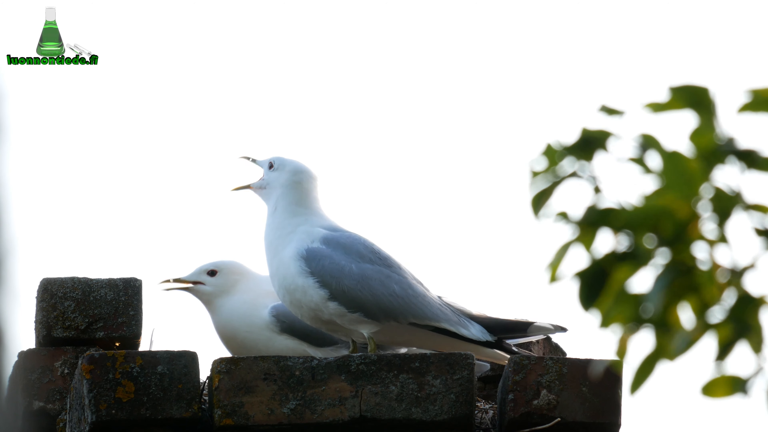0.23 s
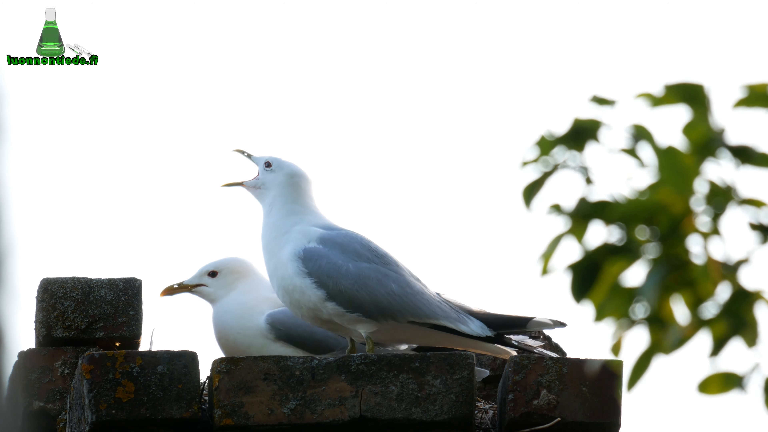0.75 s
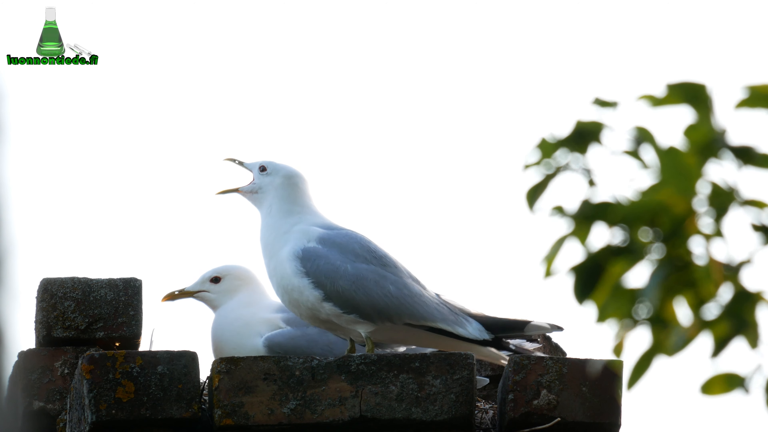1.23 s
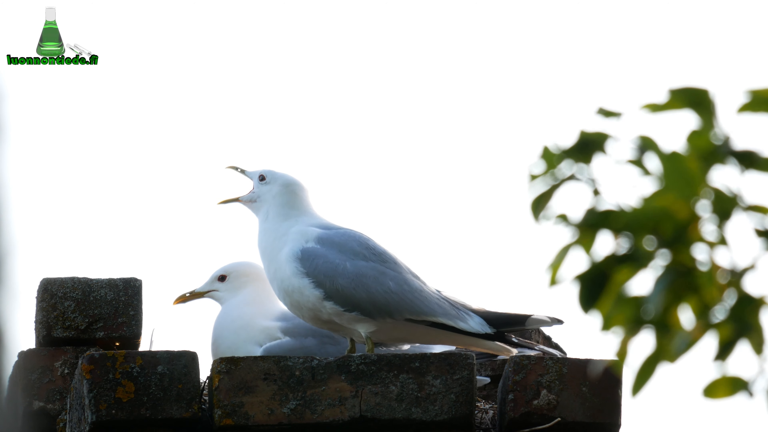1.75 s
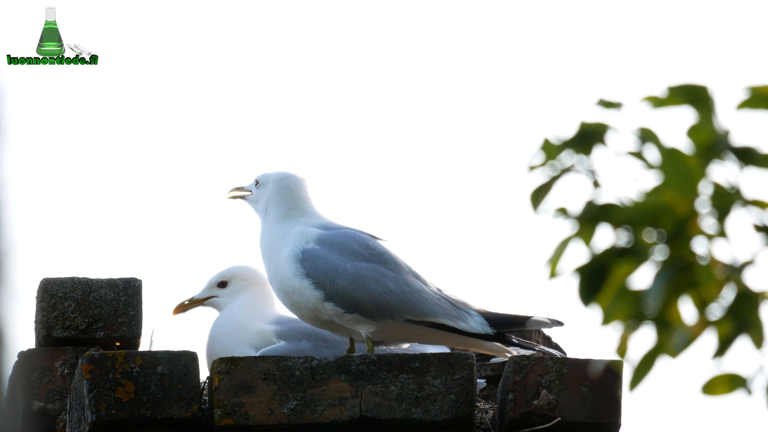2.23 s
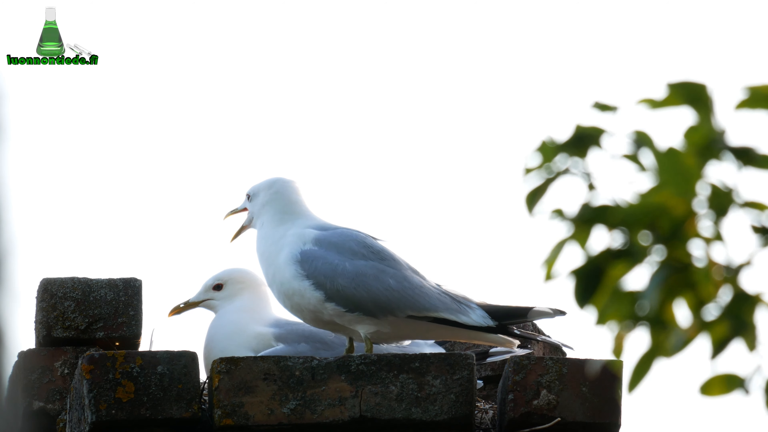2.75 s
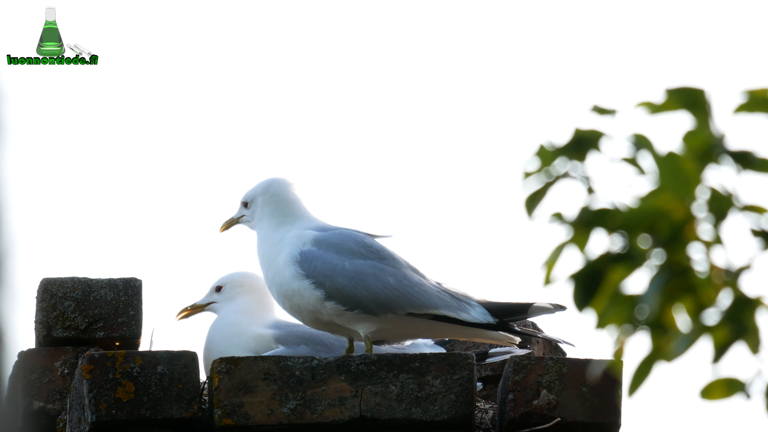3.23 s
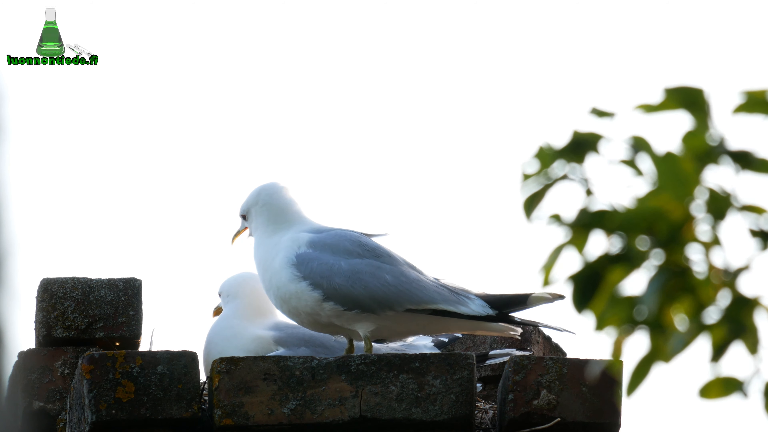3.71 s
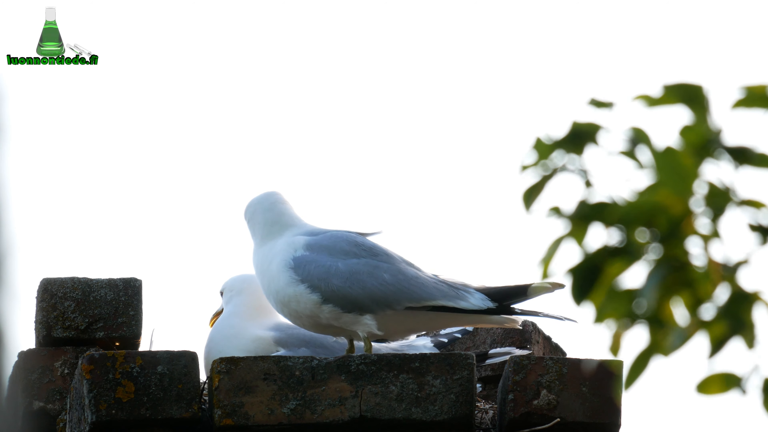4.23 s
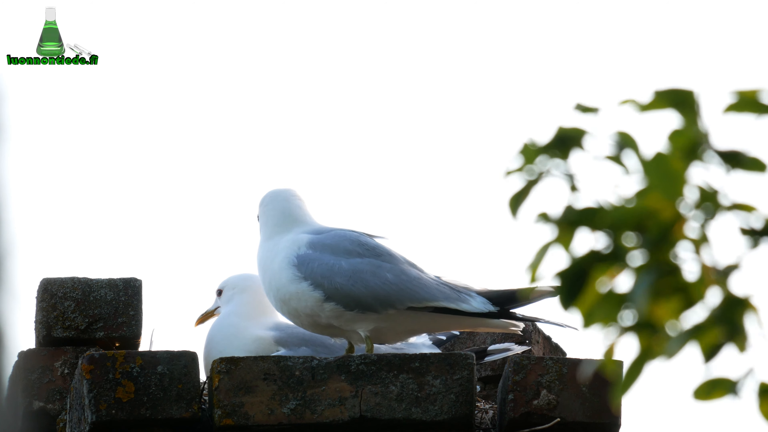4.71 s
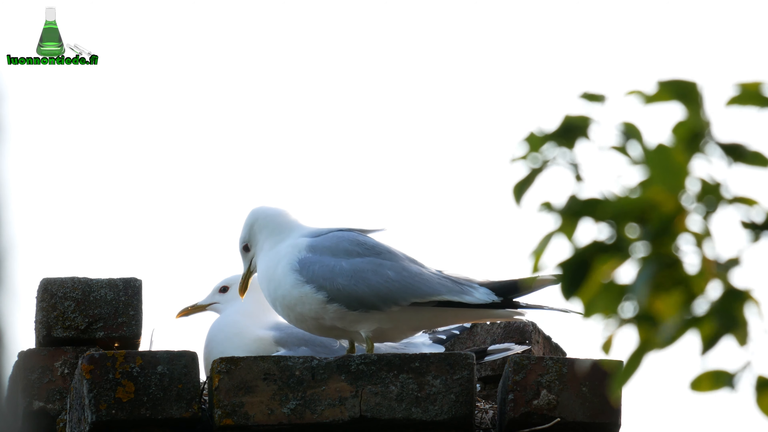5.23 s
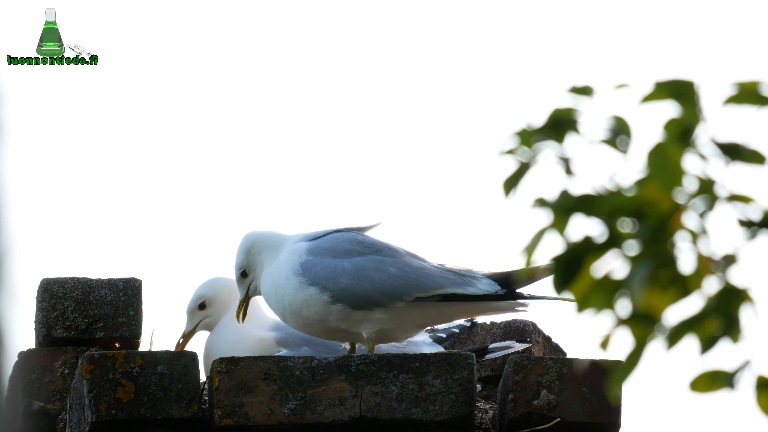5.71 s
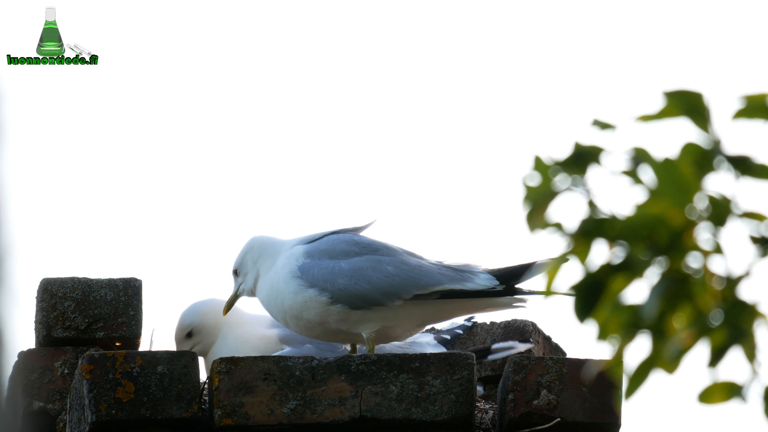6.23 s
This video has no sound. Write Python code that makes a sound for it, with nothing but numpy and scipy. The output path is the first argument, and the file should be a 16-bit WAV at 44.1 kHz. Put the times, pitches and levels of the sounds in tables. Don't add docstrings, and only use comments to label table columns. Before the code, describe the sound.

A gull calls from a chimney among houses, fairly close and almost central, with clear wall slaps and a diffuse echo tail. At 0 s the end of a long call rasps out, overlapped by a short, cut-off note from a second gull. From about 0.2 to 2.1 s, six rapid cries come roughly every third of a second; each scoops up from a low hoarse start, cracks into the bright nasal main note, flips briefly to a thin high whistle, and falls back drooping. From about 2.2 s the whistles vanish: strained single yelps settle into calmer, smoother, slightly duller cries as the head turns away, spacing out a little until 4.5 s. After a short gap, one last cry at 5.0 s droops lowest. Its echo fades into faint, wide, low traffic hum until about 6.4 s.

```python
import sys
import numpy as np
from scipy import signal
from scipy.fft import rfft, irfft
from scipy.io import wavfile
from scipy.ndimage import uniform_filter1d, map_coordinates

SR = 44100
rng = np.random.default_rng(int(sys.argv[2]) if len(sys.argv) > 2 else 0)


def attenuation_scalar(level_db):
    decades = np.asarray(level_db, float) / 20
    return 10 ** decades


def wrap_up_sound(samples):
    columns = np.atleast_2d(samples).T
    tamed = np.clip(columns, -1, 1)
    steps = np.round(tamed * 32767).astype(np.int16)
    wavfile.write(sys.argv[1], SR, steps)


N = 285327
LEAD_IN = SR // 4

# start in seconds, length in seconds, lowest pitch in Hz, highest pitch in Hz,
# level in dB.
LEAD_INS = [(0.189, .026, 634.2, 826.8, -42), (.545, 0.0329, 628.1, 879.6, -41.5),
            (0.897, 0.0276, 672.3, 860.4, -40), (1.237, 0.0314, 625.5, 865.6, -39.5),
            (1.577, 0.0362, 674.9, 899.7, -39), (1.905, 0.0421, 617.1, 883.4, -41.5),
            (2.231, 0.0406, 612.4, 911, -41), (2.543, 0.0548, 600, 893.1, -43.5),
            (2.894, 0.0303, 677.2, 906.4, -43.5), (3.232, .03, 609.6, 843, -48.5),
            (3.578, 0.0386, 640.3, 927, -44), (3.958, 0.0298, 716.3, 912.8, -45)]
HOOKED_LEAD_INS = [
    (4.355, .028, 791.5, 1006, -45.5),
    (5.008, 0.02806, 779.7, 963, -50.5),
]
VOICE_BREAKS = [(-.04, 0.0372, 1185, 1247, -32.5), (.214, 0.047, 1075, 1277, -40.5),
                (.578, 0.0488, 1149, 1319, -41), (.928, 0.0461, 1163, 1289, -39.5),
                (1.272, .046, 1208, 1322, -40), (1.614, 0.0457, 1215, 1316, -40),
                (1.947, 0.0498, 1211, 1332, -41)]
WHISTLE_FLIPS = [(.628, 0.05746, 2912, 3132, -41), (.973, 0.0632, 2923, 3156, -39.5),
                 (1.318, 0.061, 2961, 3187, -39), (1.662, .046, 2987, 3286, -39),
                 (2.005, 0.0324, 3039, 3256, -41.5)]
LONG_WHISTLE_FLIPS = [
    (0.262, .087, 2791, 3046, -36),
]
FALLING_NOTES = [(-.2, 0.1437, 916.7, 1311, -36), (.35, 0.0696, 983.2, 1302, -34.5),
                 (.695, 0.0782, 984.2, 1338, -35.5), (1.038, 0.0797, 982.1, 1341, -34.5),
                 (1.382, .073, 1007, 1370, -34), (1.707, .078, 1028, 1376, -34.5)]
SAGGING_NOTES = [
    (2.033, .082, 1035, 1398, -36.5),
]
RASPING_ENDS = [
    (.008, 0.07, 905.3, 1233, -37),
]
STRAINED_NOTES = [
    (2.272, .15, 1059, 1344, -37.5),
    (2.595, .137, 885.7, 1342, -37.5),
]
SETTLING_NOTES = [
    (2.925, .15, 1022, 1347, -36),
]
CALM_NOTES = [
    (3.261, 0.1472, 907.5, 1314, -36),
    (3.61, 0.1422, 911, 1363, -35.5),
    (3.99, 0.1361, 878, 1389, -35.5),
    (4.383, .152, 867.7, 1437, -35.5),
]
FINAL_NOTES = [
    (5.035, .147, 658, 1487, -38),
]
SECOND_GULL = [
    (-0.0078, .077, 1500, 1455, -39),
]

# share of length 0-1, height in the
# pitch range 0-1, level in dB, brightness in dB per octave, then (except slide and flips) fundamental in dB
# and third harmonic in dB.
SLIDE_SHAPE = [(0, 0.0067, -8, -4.5), (.4, .52, -2.5, 0.5), (.75, .86, -0.5, -1), (1, 0.985, 2.5, 1.5)]
HOOK_SHAPE = [(0, 0.092, -9, -8.5, 0.0034, -8), (.3, 0.077, -5, -2, 0.002, -8.5), (.7, .45, -1, 3.5, 0, -4),
              (1, 0.92, 2.5, 0, 0, 2)]
BREAK_SHAPE = [(0, 0.031, 11.5, -23, -7.5, -14), (.22, 0.48, 6.5, -5, 1, -4.5),
               (.4, 0.986, -1, 3, 9.5, -1.5), (.7, 0.978, -1, -1.5, 0.5, -3), (1, 0.95, 1, -2.5, 4, 0)]
FLIP_SHAPE = [(0, 0.87, -2.5, -6.5), (.15, 0.8, -2, 6.5), (.6, 1, -5.5, 10), (.8, 0.65, 2, 0), (1, 0, 8, 5)]
LONG_FLIP_SHAPE = [(0, 0.24, -2.5, 1), (.12, .25, 0, 6), (.55, 1, 0.5, -3.5), (.75, .9, -4.5, -0.5),
                   (1, 0, 5.5, 6)]
FALL_SHAPE = [(0, 0.971, -6, 7, 10.5, 3.5), (.22, 0.9672, -1, 2, 7.5, 0), (.58, .93, -2.5, 5, 5.5, 6.5),
              (.73, .37, 3, 6, -8, -9), (.88, 0.1642, 0, 3, -6.5, -3.5), (1, 0.087, -9.5, 0, -12.5, -9.5)]
SAG_SHAPE = [(0, 0.918, -4, 1.8, -2.5, 3.5), (.15, 0.843, -1.5, 3, 5, -2), (.58, .42, 5, 0, -4, -12),
             (.78, .22, -2, 3, -8, -7), (1, 0.0079, -12, 1, -4, -5.5)]
STRAINED_SHAPE = [(0, .66, 2.5, -5.5, -2, -5), (.16, .93, 0, -3, 2.5, -0.5), (.35, 0.935, -5, 4, 7.5, -8),
                  (.52, 0.9675, -7.5, 6.5, 11, 0.5), (.58, .78, 4.5, -1.5, -2.5, -9),
                  (.75, .58, 4, -2.5, -2.5, -10.5), (.88, .36, -3.5, 4.5, 0, -4),
                  (1, 0, -7.5, 7.5, -8.5, -7.5)]
SETTLING_SHAPE = [(0, .8, -3, 4, 1.5, 7), (.1, .86, 5, -9, -3, -1.5), (.37, 0.9755, -4.5, 5, 6, -6.5),
                  (.55, .88, -0.5, 1.5, 2.5, -1), (.79, .54, 2.5, 0, -4, -5.5), (.93, 0.44, -9.5, 4, 1, -6),
                  (1, 0.014, -3.5, 11, -12, -4.5)]
CALM_SHAPE = [(0, .84, -4, 1, 2.5, 3), (.12, .94, -2, -1.5, 0, 6.5), (.3, 0.9704, 1, -5, -1.5, 4.5),
              (.5, .91, -1, 1, 1, -1.5), (.8, .64, -4, 5, -1, -4), (.91, .47, -11.5, 5.5, 1.5, -3.5),
              (1, 0.048, -14.5, 1.5, -16, -6.5)]
FINAL_SHAPE = [(0, .8, -10, 8.5, 3, 6), (.24, 0.9636, 1, 2, -10.5, 13.5), (.5, .88, -1, 5, 4, 0),
               (.72, .64, -8.5, 13.5, 9, -2.5), (.92, .39, -20, 7.5, 7.5, -3),
               (1, 0.021, -9, 5.5, 8.5, -6.5)]
ANSWER_SHAPE = [(0, 0.904, -0.5, -1, -25, 9), (.65, 0.96, 1, 2.5, -32, -0.5),
                (.86, 0.56, -8.5, 2.5, -15, -2.5), (1, 0.14, -9.5, 0, -11.5, -5.5)]

# multiple of the pitch, level in dB.
MAIN_REGISTER = [(1, -4), (2, 0.5), (3, -5), (4, -3), (5, -1.5), (7, -3), (12, -16)]
# frequency in Hz, gain in dB.
THROAT_FACING_UP = [(500, -8), (850, -36.5), (1300, -10.5), (1700, -6.5), (2300, 6), (2800, -6),
                    (3400, -19), (4000, -0.5), (4600, -10.5), (5300, 35.5), (6600, -27.5), (7800, -22),
                    (9500, -76.5), (11000, -45)]
THROAT_TURNED_AWAY = [(500, -13.5), (850, -17), (1300, -9.5), (1700, -2), (2300, -1.5), (2800, 1),
                      (3400, -9.5), (4000, -7), (4600, -20.5), (5500, -17), (6600, -14.5), (7800, -27),
                      (9500, -35.5), (11000, -54.5)]
# time in seconds, share turned away 0-1.
HEAD_TURN = [(2.0, 0.9), (2.7, 1), (4.4, 1), (5.1, 0.97)]
# frequency in Hz, gain in dB.
BREATH = [(600, -31.5), (1300, -13.5), (2500, -2.5), (4000, -4), (6000, -6.5), (8000, -22), (10800, -30),
          (11500, -74.5)]

# delay in seconds, left level in dB, right level in dB.
WALL_ECHOES = [(.0087, -13, -13), (.0112, -15, -15), (.0119, -16, -19), (.0276, -15, -18), (.057, -20, -18),
               (.0789, -10, -12), (.0815, -19, -17), (.0901, -16, -16), (.107, -18, -17), (.136, -21, -23),
               (.2, -23, -25)]
# frequency in Hz, time to fall 60 dB in seconds.
TOWN_DECAY = [(500, 4.78), (1300, 1.22), (2700, 0.991), (5000, 0.794), (10000, 0.353)]
# frequency in Hz, side share 0-1.
TAIL_WIDTH = [(1000, 0.71), (2500, 0.635), (5000, 0.45), (9000, .3)]

# frequency in Hz, density in dB per Hz.
TRAFFIC_MID = [(15, -56), (25, -21.5), (59, -19), (144, -9), (211, -4.5), (431, -7.5), (584, -3),
               (834, -10), (1100, -12.5), (1740, -15), (4000, -21), (7000, -32), (10500, -41),
               (12000, -44.5), (15000, -49)]
TRAFFIC_SIDE = [(15, -56), (25, -43), (137, -10), (259, -7), (477, -9.5), (528, -11), (631, -10),
                (2000, -23.5), (4820, -41.5), (10500, -49), (12000, -53.5), (15000, -67.5)]
# time in seconds, level in dB.
TRAFFIC_LEVEL = [(0, -59.5), (2.999, -61), (5.5, -60.5), (6.47, -62)]


def unit(x):
    return x / np.sqrt(np.mean(x ** 2) + 1e-20)


def along(points, hz):
    f, v = np.transpose(points)
    return np.interp(np.log(hz + 1), np.log(f + 1), v)


def wobble(size, rate):
    knots = rng.standard_normal(int(size * rate / SR) + 4)
    return map_coordinates(knots, [np.arange(size) * rate / SR])


def stretched(gesture, row):
    start, length, low_hz, high_hz, db = row
    return [(start + share * length, low_hz + height * (high_hz - low_hz), db + rel_db, *colour)
            for share, height, rel_db, *colour in gesture]


def throat_db(hz, away):
    return (1 - away) * along(THROAT_FACING_UP, hz) + away * along(THROAT_TURNED_AWAY, hz) - 60 * (hz > 11500)


def breath(turn):
    puffs = rfft(rng.standard_normal(len(turn)) * (1 + np.cos(turn)))
    hz = np.fft.rfftfreq(len(turn), 1 / SR)
    return unit(irfft(puffs * attenuation_scalar(along(BREATH, hz)), len(turn)))


def add_note(voice, rows, source, jitter, breath_db, fade, slack):
    s, hz, db, *colour = np.transpose(rows)
    t = np.arange(s[0] - fade, s[-1] + fade, 1 / SR)
    bright, first_db, third_db = [np.interp(t, s, c) for c in colour] + [0] * (3 - len(colour))
    away = np.clip(np.interp(s[0], *np.transpose(HEAD_TURN)), 0, 1)

    ease = min(round(SR * (.005 + .012 * away ** 4)), len(t) // 5)
    glide = uniform_filter1d(np.interp(t, s, hz), ease, mode="nearest")
    turn = 2 * np.pi * np.cumsum(glide * (1 + jitter * wobble(len(t), 300))) / SR
    droop = np.clip(-np.gradient(np.log(glide)) * SR, 0, 12)

    k = np.arange(1, 16)[:, None]
    harmonic_db = throat_db(k * glide, away) + along(source, k)
    harmonic_db += bright * np.log2(np.maximum(k * glide / 2700, 1))
    harmonic_db -= slack * droop * np.log2(np.maximum(k / 2, 1))
    harmonic_db += first_db * (k == 1) + third_db * (k == 3)
    flicker = np.array([wobble(len(t), 46.56) for _ in k])
    harmonic_db += 4.5 * (k > 2) * flicker
    gain = attenuation_scalar(harmonic_db)
    gain = gain / np.sqrt(np.sum(gain ** 2, axis=0) / 2)
    tone = np.sum(gain * np.sin(k * turn + k * k * 0.707), axis=0)

    air = attenuation_scalar(breath_db - 5.3 * away) * breath(turn)
    edge = np.clip(np.minimum(t - t[0], t[-1] - t) / (2 * fade), 0, 1)
    start = round(t[0] * SR) + LEAD_IN
    voice[start:start + len(t)] += attenuation_scalar(np.interp(t, s, db)) * edge * (tone + air)


def gull():
    voice = np.zeros(N + LEAD_IN)
    hoarse_db, clear_db = -11, -16.5
    steady, slack = .0025, 1.3
    # (multiple, dB)
    low = [(1, 1.0), (2, 0), (3, -0.5), (4, -4), (5, -3), (12, -8.0)]
    thin = [(1, -0.5), (3, -4.0)]
    harsh = [(1, -2.5), (2, 2.5), (3, -5), (4, 5), (6, 2), (12, -16)]

    hoarse = [(SLIDE_SHAPE, LEAD_INS, low), (HOOK_SHAPE, HOOKED_LEAD_INS, low),
              (BREAK_SHAPE, VOICE_BREAKS, MAIN_REGISTER), (FALL_SHAPE, RASPING_ENDS, harsh)]
    clear = [(FALL_SHAPE, FALLING_NOTES), (SAG_SHAPE, SAGGING_NOTES), (STRAINED_SHAPE, STRAINED_NOTES),
             (SETTLING_SHAPE, SETTLING_NOTES), (CALM_SHAPE, CALM_NOTES), (FINAL_SHAPE, FINAL_NOTES),
             (ANSWER_SHAPE, SECOND_GULL)]
    whistled = [(FLIP_SHAPE, WHISTLE_FLIPS), (LONG_FLIP_SHAPE, LONG_WHISTLE_FLIPS)]

    for gesture, rows, source in hoarse:
        for row in rows:
            add_note(voice, stretched(gesture, row), source, 2 * steady, hoarse_db, fade=.0015, slack=slack)
    for gesture, rows in clear:
        for row in rows:
            add_note(voice, stretched(gesture, row), MAIN_REGISTER, steady, clear_db, fade=.0015, slack=slack)
    for gesture, rows in whistled:
        for row in rows:
            add_note(voice, stretched(gesture, row), thin, steady, clear_db, fade=0.00099, slack=0)
    return attenuation_scalar(2.0) * voice


def roofs(x, tail_db, rise, lumpy_db, dull):
    hz, t, z = signal.stft(rng.standard_normal((2, SR * 3 // 2)), SR, nperseg=256)
    z[1] *= along(TAIL_WIDTH, hz)[:, None]
    lumps = attenuation_scalar(lumpy_db * unit(uniform_filter1d(rng.standard_normal(len(t)), size=2)))
    decay = attenuation_scalar(-60 * t / along(TOWN_DECAY, hz)[:, None]) * (1 - np.exp(-t / rise))
    mid, side = signal.istft(z * lumps * decay, SR, nperseg=256)[1]
    answer = attenuation_scalar(tail_db) * np.array([mid + side, mid - side]) / np.linalg.norm(mid)

    walls = np.zeros_like(answer)
    for s, *db in WALL_ECHOES:
        walls[:, round(s * SR)] = attenuation_scalar(db)
    answer += signal.lfilter([1 - dull], [1, -dull], walls)
    answer[:, 0] += 1
    return signal.fftconvolve(x[None], answer, axes=1)[:, LEAD_IN:LEAD_IN + N]


def coloured(spectrum, patchy_db):
    hz, _, z = signal.stft(rng.standard_normal(N + 4096), SR, nperseg=4096, noverlap=3584)
    patches = uniform_filter1d(uniform_filter1d(rng.standard_normal(z.shape), 30, 0), 8, 1)
    gain = attenuation_scalar(along(spectrum, hz)[:, None] + patchy_db * unit(patches))
    return unit(signal.istft(z * gain, nperseg=4096, noverlap=3584)[1][:N])


def traffic():
    s, db = np.transpose(TRAFFIC_LEVEL)
    level = attenuation_scalar(np.interp(np.arange(N) / SR, s, db) + 1.2 * wobble(N, 2.5715))
    mid = coloured(TRAFFIC_MID, patchy_db=.7)
    side = attenuation_scalar(3.5) * coloured(TRAFFIC_SIDE, patchy_db=.7)
    return level * np.array([mid + side, mid - side])


def scene():
    calls = roofs(gull(), tail_db=-8, rise=.022, lumpy_db=3, dull=0.3)
    return calls * attenuation_scalar([[.3], [-.3]]) + traffic()


def top_cut(x):
    return signal.sosfilt(signal.butter(12, 15100, fs=SR, output="sos"), x)


def record(dry):
    fade = np.sin(np.pi / 2 * np.minimum(np.arange(N) / (0.00053 * SR), 1)) ** 2
    return top_cut(dry * fade)


dry = scene()
out = record(dry)
wrap_up_sound(out)
```